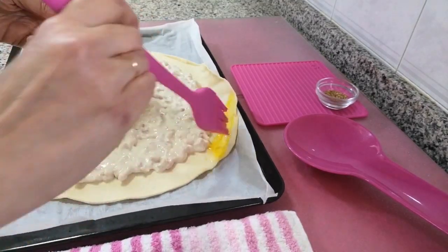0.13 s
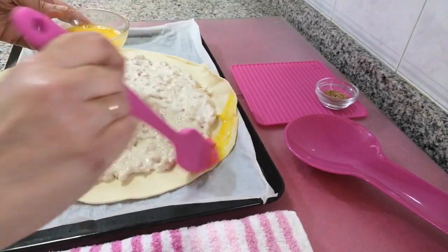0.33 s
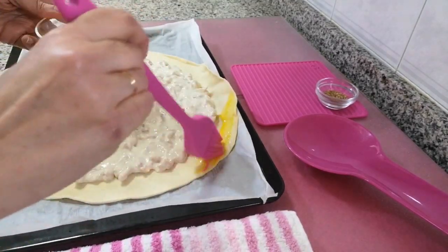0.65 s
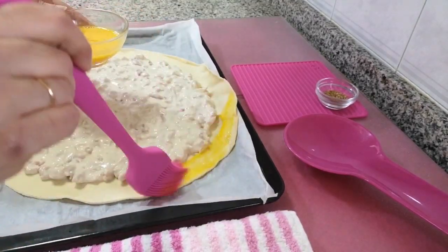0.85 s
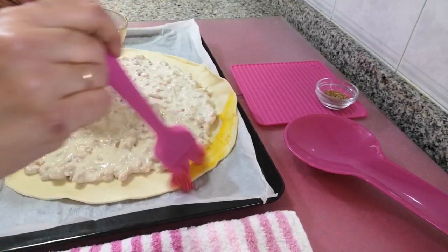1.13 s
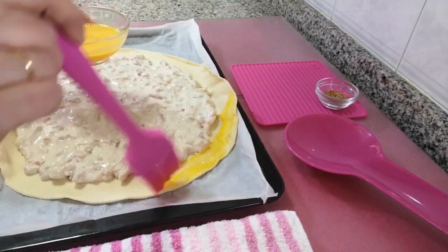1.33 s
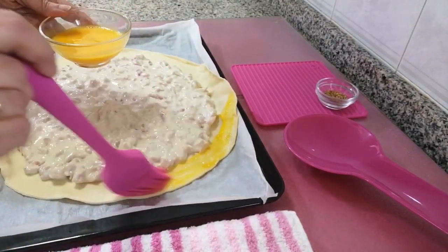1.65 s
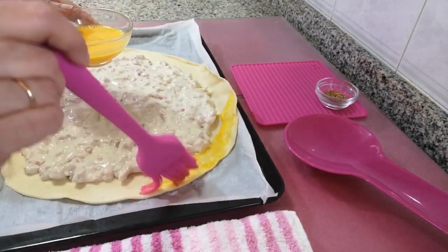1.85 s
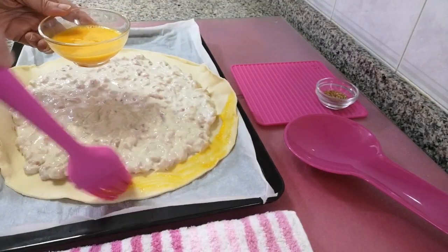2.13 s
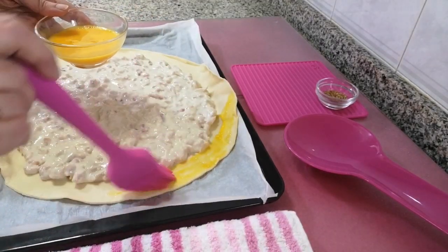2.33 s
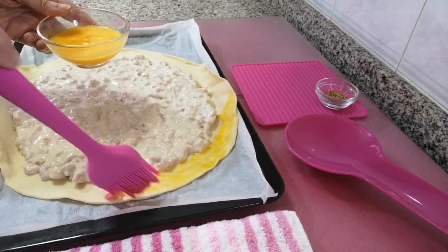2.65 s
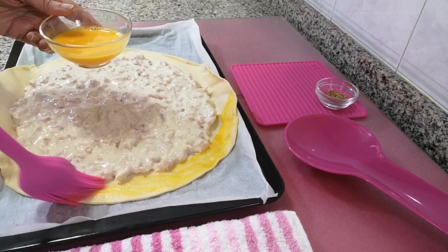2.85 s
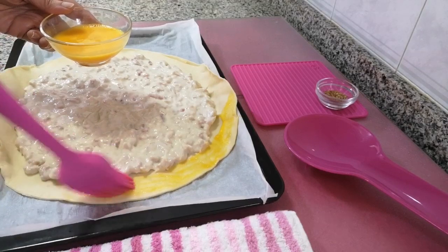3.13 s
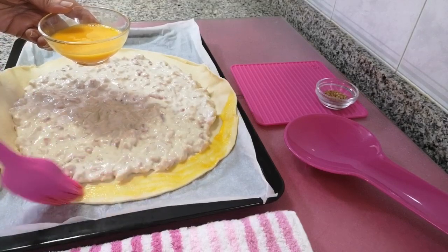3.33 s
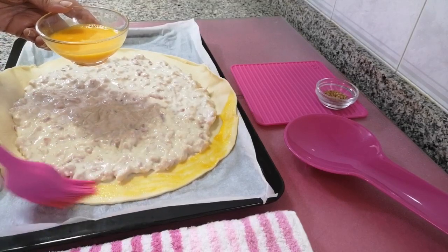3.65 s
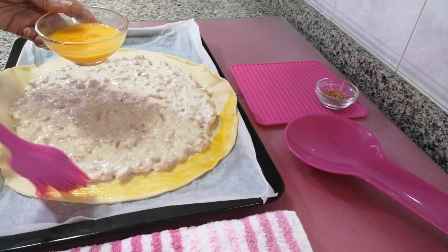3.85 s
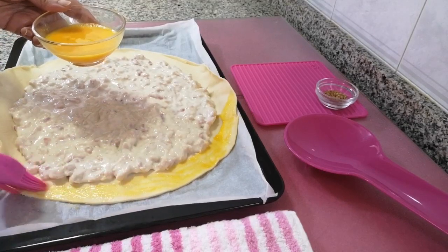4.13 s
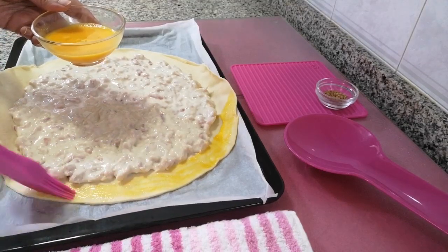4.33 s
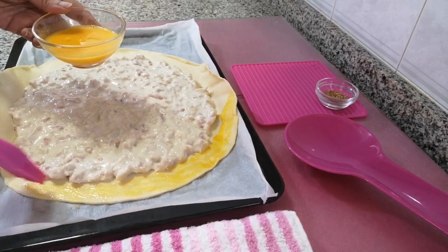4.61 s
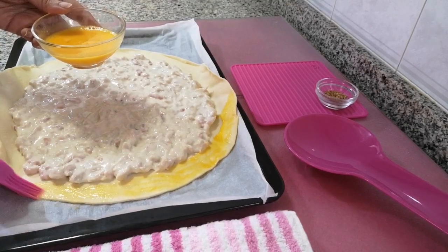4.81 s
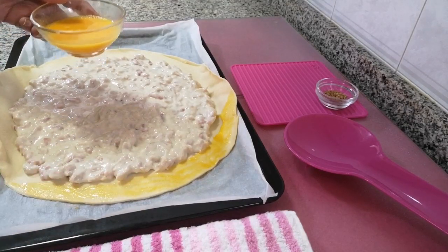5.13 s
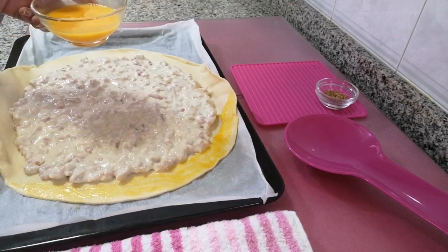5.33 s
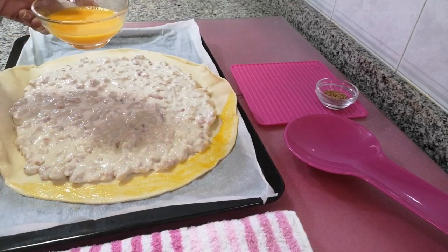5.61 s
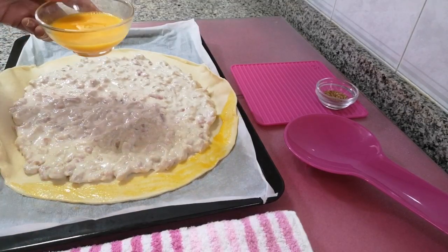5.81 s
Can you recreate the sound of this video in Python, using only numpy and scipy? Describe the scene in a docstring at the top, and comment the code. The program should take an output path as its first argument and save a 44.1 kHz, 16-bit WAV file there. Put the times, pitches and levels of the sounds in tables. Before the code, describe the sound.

A wet silicone brush dabs and smears egg around pastry with fine crackles, small clicks and soft tray knocks over a low kitchen hum.

```python
"""Egg-washing a pastry, close

Quiet kitchen, a pair of microphones close to the pastry on its baking paper. A silicone brush dabs and
wipes beaten egg round the rim: wet bristles smear with a fine crackle of tiny random bursts, and snap free
with clicks over a ringing pocket. Wet pockets squelch as resonant noise, the stiff paper cracks once in a
quick run, and the tray knocks under the hand with decaying low modes. Behind it an appliance hums at twice
the mains rate over rumble and faint hiss; sparse reflections of the small room answer every click."""
import sys
import numpy as np
from scipy import signal
from scipy.fft import rfft, irfft
from scipy.io import wavfile
from scipy.ndimage import uniform_filter1d

SR = 44100
rng = np.random.default_rng(int(sys.argv[2]) if len(sys.argv) > 2 else 0)


def master(y):
    """Save y as 16-bit WAV."""
    cut = np.clip(np.atleast_2d(y).T, -1, 1)
    pcm = np.round(cut * 32767)  # scale
    wavfile.write(sys.argv[1], SR, pcm.astype(np.int16))


N = 263172
TIME = np.arange(N) / SR  # s

# Brush dabs, by moment of touch: [t/s, length/s, peak pressure level/dB]
DAB_ROWS = [(0.001, 0.094, -68.5), (0.2216, 0.084, -67.5), (0.4604, 0.038, -65.5), (0.687, 0.21, -69),
            (0.934, 0.049, -67), (1.14, .2, -64.5), (1.4075, 0.065, -68), (1.8705, 0.093, -66.5),
            (2.022, 0.14, -65.5), (2.1154, 0.056, -64), (2.354, 0.049, -69), (2.591, 0.04, -68),
            (2.754, .11, -62.5), (2.827, 0.17, -69), (3.028, 0.03, -69), (3.062, 0.06, -67.5),
            (3.2783, 0.096, -61.5), (4.01, 0.32, -65.5), (4.252, 0.03, -67), (4.722, 0.1, -71),
            (4.949, 0.1, -66), (5.195, 0.031, -69.5), (5.426, 0.059, -70.5), (5.6676, 0.041, -75),
            (5.902, 0.045, -71)]
# Longer wipes along the rim: [start t/s, length/s, peak pressure level/dB]
WIPE_ROWS = [(0.26, 0.23, -74.5), (0.716, 0.22, -64.5), (1.162, .08, -62), (1.579, .14, -67),
             (2.37, 0.16, -73), (3.509, 0.31, -58.5), (4.053, 0.15, -66), (4.497, 0.12, -63.5),
             (4.83, 0.1, -49)]
# Loud wet snaps of the bristles: [t/s, relative level/dB, pocket ring against the click/dB]
SNAP_ROWS = [(0.7296, -25, 0.5), (0.734, -40, 10), (0.8746, -34.5, 1.5), (1.1775, -39, -5),
             (1.1996, -45.5, 5.5), (1.29, -49, 5), (2.0204, -40, -31), (2.2433, -48, -34),
             (2.591, -45.5, -30), (3.501, -45, -15), (3.5885, -34, -11), (4.58, -36.5, -12),
             (4.5914, -34, -22), (4.8507, -37, -23), (4.8748, -30, -14), (4.9006, -41, -22)]
# Wet squelches, hollow from big pockets and sizzling from tiny ones:
# [t/s, length/s, level before the fade in and out/dB, centre f/Hz, width f/Hz]
SQUELCH_ROWS = [(1.019, 0.041, -59, 5050, 3200), (2.013, 0.015, -51, 8270, 1400),
                (2.03, 0.4, -79, 7260, 1390), (2.75, .035, -58, 3200, 700), (3.368, 0.045, -72, 846, 500),
                (4.006, 0.069, -65.5, 1290, 450)]
# Brush slaps on the paper at the tray's edge:
# [t/s, relative level/dB, gain of the ring/dB, left over right/dB, scatter against the crack/dB]
SLAP_ROWS = [(4.4660, -27, -14, 8, 18.5), (4.4700, -26, 1, -23.5, 1.5), (4.4786, -14, -21, -10.5, -5.5),
             (4.4885, -26, 10.5, 18, 14)]
# Knocks of the tray: [t/s, relative level/dB, relative level of the deep thud/dB]
KNOCK_ROWS = [(0.059, -59, -19), (1.050, -42, 1), (1.33, -55, -8), (1.89, -53.5, 6.5), (4.422, -49.5, -1.5),
              (4.489, -53, -0.5), (4.815, -40, 5)]
# Low modes of the tray: [f/Hz, relative level/dB, t60/s]
TRAY_MODES = [(85, 1.5, 0.15), (137.3, -2, 0.4), (151.3, -2.5, 0.45), (204.9, 3, 0.42), (253, -8.5, 0.09),
              (303.5, -7, 0.21), (372, -9.5, 0.14)]

# Spectrum of the smearing egg: [f/Hz, relative level/dB]
SMEAR_COLOUR = [(500, -17), (1500, -23.5), (2500, -4), (3400, -9), (4400, -1.5), (5600, 2.5), (7400, 1.5),
                (9300, -1.5), (10800, -14.5), (12200, -7.5), (14000, -31), (16000, -19.5)]
# Spectrum of the dragging bristles: [f/Hz, relative level/dB]
DRAG_COLOUR = [(400, -15.5), (1000, -16.5), (1700, -8.5), (2300, -3.5), (3000, -5), (3700, -2.5),
               (5500, -19)]
# Spectrum of a bristle snap or flick: [f/Hz, relative level/dB]
SNAP_COLOUR = [(200, -43), (900, -12), (1700, -0.5), (3000, 0), (4300, 3), (6500, 4.5), (9000, -2),
               (12000, -7), (16000, -16)]
# Spectrum of a crack of the paper: [f/Hz, relative level/dB]
SLAP_COLOUR = [(240, -37), (400, -21.5), (1250, -21.5), (1650, -6), (1900, -14), (2180, -7.5), (4110, -12),
               (5110, -1), (6150, -9.5), (6740, -2.5), (9470, -7), (10500, -13), (11800, -8),
               (15000, -18.5), (16000, -20)]
# Spectrum of the tap and shiver of the tray: [f/Hz, relative level/dB]
KNOCK_COLOUR = [(100, -9.5), (350, -4.5), (550, -2.5), (850, 3), (1250, -4), (1750, -1.5), (2500, -10),
                (3500, -3.5), (5000, -16), (7500, -19.5), (9500, -29), (16000, -37)]

# Reverberation of the kitchen: [f/Hz, t60/s]
KITCHEN_T60 = [(150, 0.29), (800, 0.27), (2800, 0.21), (7000, 0.19), (15000, 0.1)]
# Hum of the appliance: [f/Hz, rms level before the background curve/dB, depth of waver 0-1]
HUM_PARTIALS = [(100.25, -50.5, 0.2), (201.2, -67.5, 0.5), (235, -80, 0.8), (265.9, -73.5, 0.71),
                (296.3, -81.5, 1)]
# Spectrum of the room's hiss: [f/Hz, relative level/dB]
AIR_COLOUR = [(60, -14), (130, -4.5), (220, 0), (290, -13), (390, -12.5), (550, -18), (900, -16.5),
              (1500, -18.5), (2100, -17), (2700, -21.5), (3500, -25), (7500, -28.5), (12000, -34),
              (16000, -41)]
# Spectrum of the rumble: [f/Hz, relative level/dB]
RUMBLE_COLOUR = [(12, -33), (26, -18), (33, 1), (37, 4), (42, 1.5), (52, -12), (68, -20.5), (90, -13.5),
                 (125, -12.5), (170, -32), (300, -50), (1000, -100)]
# Gain of hum and hiss, sinking at the end: [t/s, level/dB]
BACKGROUND_CURVE = [(0, -1.14), (5.15, -1.14), (5.45, -4.5), (5.97, -10)]
# Rms level of the rumble: [t/s, level/dB]
RUMBLE_CURVE = [(0, -56), (1.2, -54), (2.1, -54), (2.8, -53.5), (3.8, -54.5), (4.1, -57), (5.2, -58.5),
                (5.97, -59)]
# Likeness of left and right in hiss and rumble: [f/Hz, likeness 0-1]
SIDE_LIKENESS = [(100, 1), (200, 0.92), (350, 0), (700, 0), (1500, 0), (16000, 0)]

# A dab rises in this time; a wipe presses hardest at this share of its length
DAB_RISE_S, WIPE_CREST = 0.014, 0.75
# The tick of a landing dab: raise over the dab's level, ring and scatter against the bare click
TICK_DB, TICK_RING_DB, TICK_SCATTER_DB = 20.5, -10.5, 24.5
SNAP_SCATTER_DB = 11
# The pocket under a snap: centre, width, width of its skirt
POCKET_HZ, POCKET_WIDTH_HZ, POCKET_SKIRT_HZ = 2920, 750, 1300
# Stray flicks: rate in each stream of grains (per s), level against the smear
FLICKS_PER_S, FLICK_DB = 70, -7
# Dull drag of the bristles against the bright smear of egg
BRISTLE_DRAG_DB = -0.5
# Tray knock: ring times of the tap and the shiver, shiver against tap
TAP_T60_S, SHIVER_T60_S, SHIVER_DB = 0.025, 0.1, -8
AIR_DB = -66  # rms, before the background curve
EDGE_HZ = 15900  # upper band edge of the recorder


def strokes():
    """Pressure drives a bright crackle of egg, stray flicks and the duller drag of the bristles."""
    # the bristles catch and slip many times in a stroke
    slips = evened(gain_of(1.8 * drift(120)))
    smear_grains = crackle(per_s=2200, spread_db=2.5, apart=1.0)
    smear = wandering(colour(smear_grains, SMEAR_COLOUR), patchy_db=3.0)
    drag_grains = crackle(per_s=1300, spread_db=2.0, apart=2.8)
    drag = wandering(colour(drag_grains, DRAG_COLOUR), patchy_db=2.5)
    flicks = colour(crackle(per_s=FLICKS_PER_S, spread_db=1, apart=0.62), SNAP_COLOUR)
    bright = sides(-10.5) * (smear + gain_of(FLICK_DB) * flicks)
    dull = gain_of(BRISTLE_DRAG_DB) * sides(-1) * drag
    return pressure() * slips * (bright + dull)


def pressure():
    """How hard the brush presses: dabs rise quickly, wipes build up slowly; their powers add."""
    presses = [(s, DAB_RISE_S, length, db) for s, length, db in DAB_ROWS]
    presses += [(s, WIPE_CREST * length, length, db) for s, length, db in WIPE_ROWS]
    power = np.zeros(N)
    for s, rise, length, db in presses:
        shape = np.interp(TIME - s, [0, rise, length], [0, 1, 0])
        power += (gain_of(db) * shape) ** 2
    return np.sqrt(power)


def crackle(per_s, spread_db, apart):
    """Tiny bursts of uneven size at random moments: one shared stream, and one more for each side."""
    pops = rng.random((3, N)) < per_s / SR
    size = gain_of(spread_db * np.minimum(rng.exponential(1, (3, N))[pops], 4))
    grains = np.zeros((3, N))
    grains[pops] = size * rng.choice([-1, 1], (3, N))[pops]
    return evened(grains[0] + apart * grains[1:])


def wandering(x, patchy_db, size=512):
    """The bristles splay and regroup, so patches of the spectrum come and go."""
    z = signal.stft(x, nperseg=size)[2]
    chance = rng.standard_normal(z.shape[1:])
    across_bands = uniform_filter1d(chance, size=11, axis=0)
    patches = evened(uniform_filter1d(across_bands, size=7, axis=1))
    return evened(signal.istft(z * gain_of(patchy_db * patches))[1][:, :N])


def snaps():
    """A soft tick as each dab lands, and the listed louder snaps."""
    out = np.zeros((2, N))
    for s, length, db in DAB_ROWS:
        add(out, s, snap(db + TICK_DB, TICK_RING_DB, TICK_SCATTER_DB))
    for s, db, ring_db in SNAP_ROWS:
        add(out, s, snap(db, ring_db, SNAP_SCATTER_DB))
    return out


def snap(db, ring_db, scatter_db):
    """Bristles meet or let go of the sticky egg: a click, and a small pocket that rings under it."""
    click = burst(scatter_db=scatter_db, t60=0.045, apart=1.0)
    pocket = ring(ring(click, POCKET_HZ, POCKET_WIDTH_HZ), POCKET_HZ, POCKET_SKIRT_HZ)
    pocket *= gain_of(ring_db) / np.linalg.norm(pocket[0])
    return gain_of(db + 9) * (sides(-6.5) * colour(click, SNAP_COLOUR) + sides(0.42) * pocket)


def squelches():
    """Wet pockets give way with a fizz of noise about their own pitch, fading in and out."""
    out = np.zeros((2, N))
    for s, length, db, hz, width_hz in SQUELCH_ROWS:
        window = signal.windows.hann(round(length * SR))
        noise = rng.standard_normal((2, len(window)))
        fizz = evened(ring(ring(noise, hz, width_hz), hz, width_hz))
        add(out, s, gain_of(db) * sides(-5) * window * fizz)
    return out


def slaps():
    """The stiff paper buckles in a quick run of cracks, each exciting a ring."""
    out = np.zeros((2, N))
    for s, db, ring_db, pan_db, scatter_db in SLAP_ROWS:
        crack = burst(scatter_db=scatter_db, t60=0.037, apart=1.0)
        pocket = gain_of(ring_db) * ring(crack, 2730, 700)
        add(out, s, gain_of(db + 10.5) * sides(pan_db) * (colour(crack, SLAP_COLOUR) + pocket))
    return out


def knocks():
    """The tray rocks on the worktop: a tight dull tap, a short shiver of the sheet and its low modes."""
    out = np.zeros((2, N))
    t = np.arange(SR // 2) / SR
    modes = np.zeros(len(t))
    for k, (hz, db, t60) in enumerate(TRAY_MODES):
        # neighbouring modes start with opposite sign
        modes += (-1) ** k * gain_of(db - 60 * t / t60) * np.sin(2 * np.pi * hz * t)
    modes *= 1 - np.exp(-t / 0.0044)  # soft onset
    for s, db, thud_db in KNOCK_ROWS:
        tap = burst(scatter_db=7.5, t60=TAP_T60_S, apart=0.6)
        shiver = burst(scatter_db=20, t60=SHIVER_T60_S, apart=0.77)
        rattle = colour(tap + gain_of(SHIVER_DB) * shiver, KNOCK_COLOUR)
        add(out, s, gain_of(db + 20.5) * sides(-2) * rattle)
        add(out, s, gain_of(db + thud_db - 11) * sides(0) * modes)
    return out


def burst(scatter_db, t60, apart, size=4096):
    """One sharp impulse, then its scatter off the tray and worktop; energy 1 on the left."""
    t = np.arange(size) / SR
    chance = rng.standard_normal((3, size))
    x = (chance[0] + apart * chance[1:]) * gain_of(-60 * t / t60)
    x *= gain_of(scatter_db) / np.linalg.norm(x[0])
    x[:, 0] = 1
    return x / np.linalg.norm(x[0])


def spaced(x, size=4):
    """Sound from the brush reaches the right microphone a few samples late."""
    return np.array([x[0], np.pad(x[1], (size, 0))[:N]])


def kitchen(x, size=20):
    """Sparse reflections of random sign, each band dying at its own speed."""
    taps = np.zeros((2, SR // 2))
    # one reflection in each slot of a few samples, after a short gap
    starts = np.arange(200, SR // 2 - size, size)
    at = starts + rng.integers(0, size, (2, len(starts)))
    np.put_along_axis(taps, at, rng.choice([-1., 1.], at.shape), 1)
    hz, t, z = signal.stft(taps, SR, nperseg=256)
    decay = gain_of(-60 * t / read(KITCHEN_T60, hz)[:, None])
    tail = signal.istft(z * decay, SR)[1]
    high_pass = signal.butter(2, 250, "high", fs=SR, output="sos")
    above_bass = signal.sosfilt(high_pass, x.mean(0))
    return signal.fftconvolve(above_bass[None], tail / np.linalg.norm(tail[0]), axes=1)[:, :N]


def background():
    """A wavering hum, deep rumble and the faint hiss of the room."""
    hum = np.zeros(N)
    for hz, db, waver in HUM_PARTIALS:
        # complex drift wavers both level and phase
        swing = 1 + waver * (drift(4.2) + 1j * drift(4.4))
        hum += gain_of(db) * evened(np.real(swing * np.exp(2j * np.pi * hz * TIME)))
    air = gain_of(AIR_DB) * wash(AIR_COLOUR)
    rumble = wash(RUMBLE_COLOUR) * follow(RUMBLE_CURVE)
    return (hum + air) * follow(BACKGROUND_CURVE) + rumble


def wash(points):
    """Steady coloured stereo noise, alike on both sides in the bass."""
    hz = np.fft.rfftfreq(N, 1 / SR)
    a, b = rfft(rng.standard_normal((2, N)))
    same = np.clip(read(SIDE_LIKENESS, hz), 0, 1)
    pair = np.array([a, same * a + np.sqrt(1 - same ** 2) * b])
    return evened(irfft(pair * gain_of(read(points, hz)), N))


def drift(rate_hz):
    """Random low-frequency wander of rms 1, held mostly below the given rate."""
    hz = np.fft.rfftfreq(N, 1 / SR)
    return evened(irfft(rfft(rng.standard_normal(N)) * np.exp(-(hz / rate_hz) ** 2), N))


def colour(x, points, size=4096):
    """Causal minimum-phase filter of energy 1 with the given spectrum."""
    log_gain = np.log(gain_of(read(points, abs(np.fft.fftfreq(size, 1 / SR)))))
    spectrum = np.exp(np.conj(signal.hilbert(log_gain)))
    taps = np.fft.ifft(spectrum).real[:size // 2]
    return signal.oaconvolve(x, taps[None] / np.linalg.norm(taps), axes=1)[:, :x.shape[1]]


def ring(x, hz, width_hz):
    """A resonance with gain 1 at its centre."""
    return signal.lfilter(*signal.iirpeak(hz, hz / width_hz, SR), x)


def sides(pan_db):
    """Left and right gains, left over right by the given balance, with mean 1."""
    g = gain_of([[pan_db / 2], [-pan_db / 2]])
    return g / g.mean()


def add(mix, s, sound):
    """Mixes a stereo sound in at a time."""
    part = mix[:, max(round(s * SR), 0):][:, :sound.shape[1]]
    part += sound[:, :part.shape[1]]


def follow(rows):
    """Gain over time from a curve in dB."""
    return gain_of(np.interp(TIME, *np.transpose(rows)))


def read(points, hz):
    """Reads a table on a log-frequency axis."""
    f, value = np.transpose(points)
    return np.interp(np.log(hz + 1), np.log(f + 1), value)


def evened(x):
    """Scales to rms 1."""
    return x / np.sqrt(np.mean(x ** 2) + 1e-20)


def gain_of(db):
    """Decibels to gain."""
    return 10 ** (np.asarray(db) / 20)


def scene():
    """Brush, paper and tray close by, with the kitchen's answer and background behind."""
    brush = spaced(strokes() + snaps() + slaps())
    near = brush + squelches() + knocks()
    room = gain_of(-6.5) * sides(-1.33) * kitchen(near)
    return near + room + background()


def record(dry):
    """The band limit of the recorder: a steep linear-phase low-pass."""
    low_pass = signal.firwin(511, EDGE_HZ, window=("kaiser", 9), fs=SR)
    return signal.oaconvolve(dry, low_pass[None], "same")


dry = scene()
out = record(dry)
master(out)
```